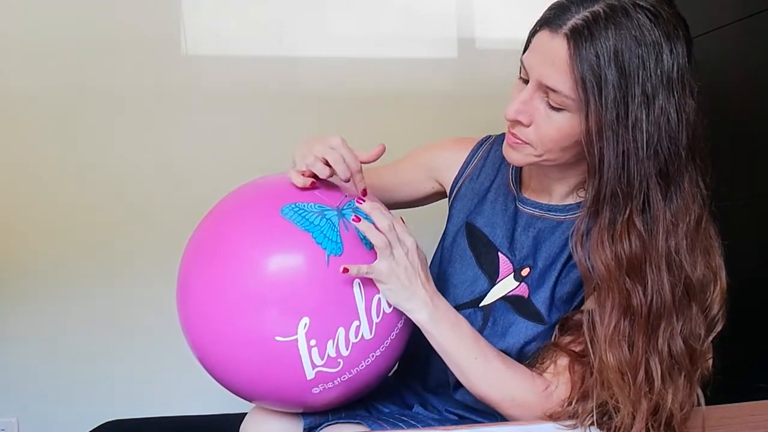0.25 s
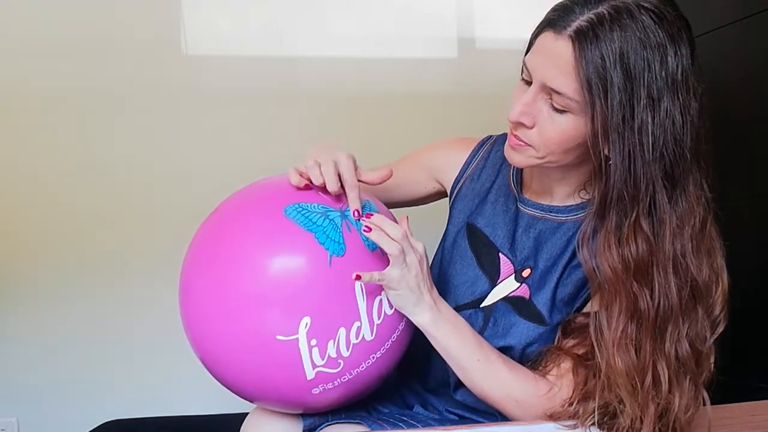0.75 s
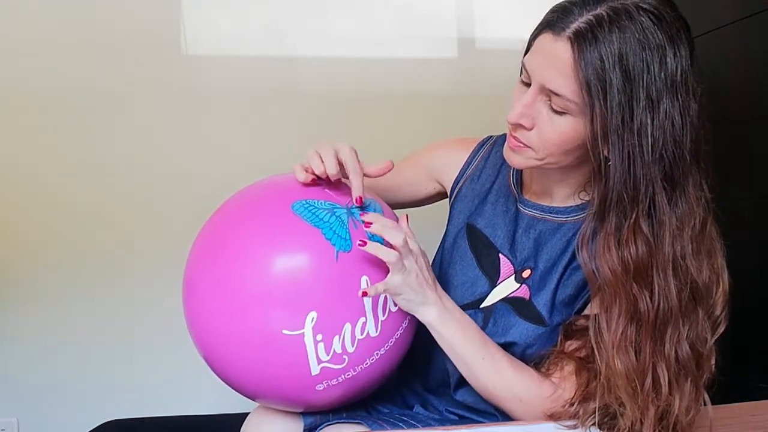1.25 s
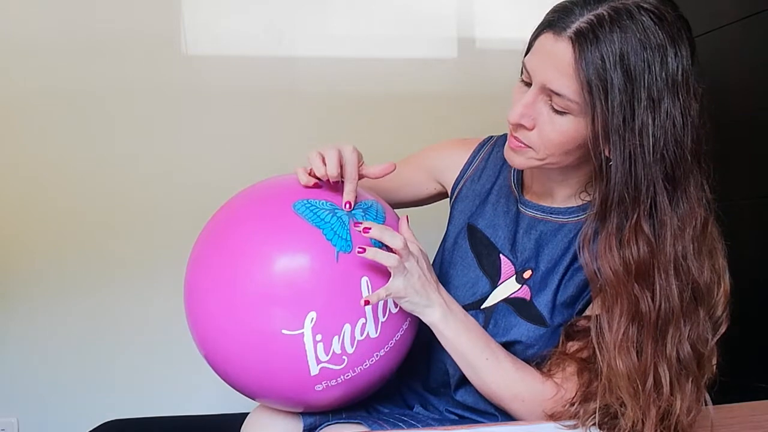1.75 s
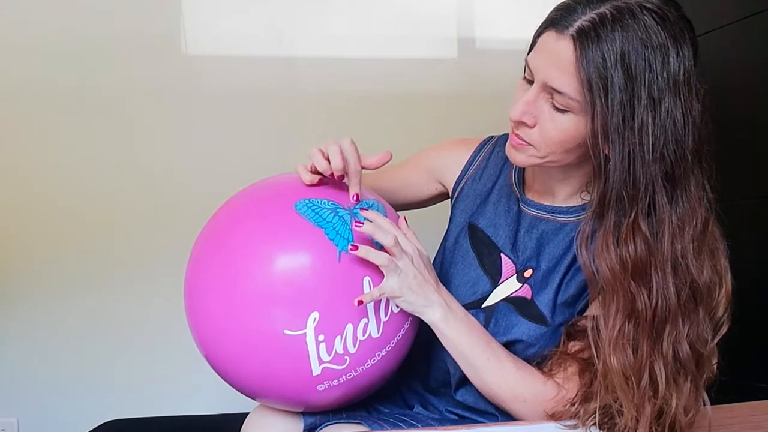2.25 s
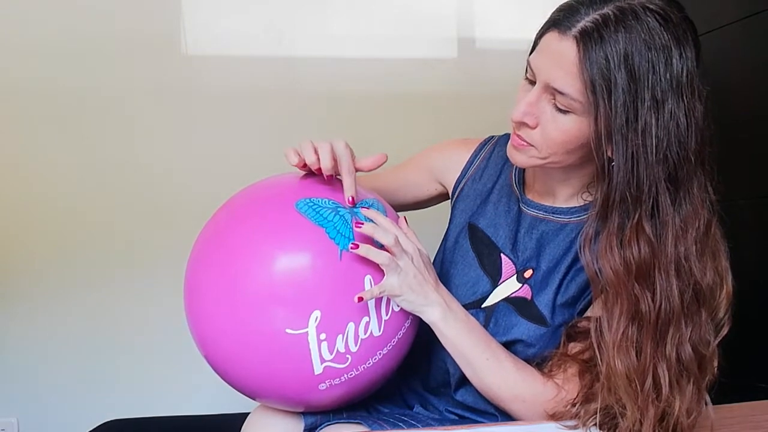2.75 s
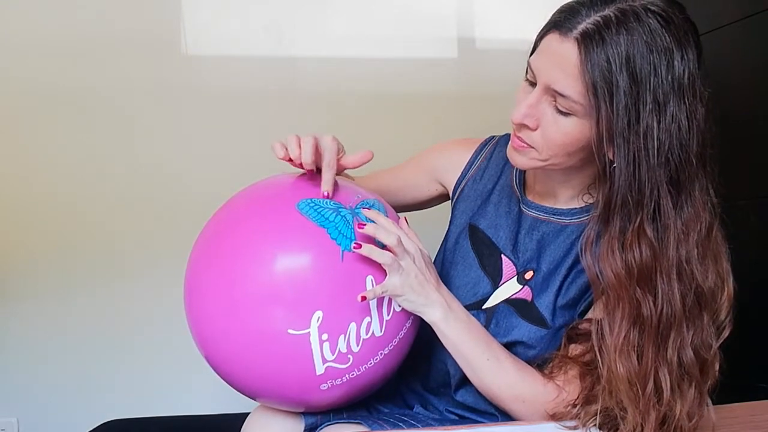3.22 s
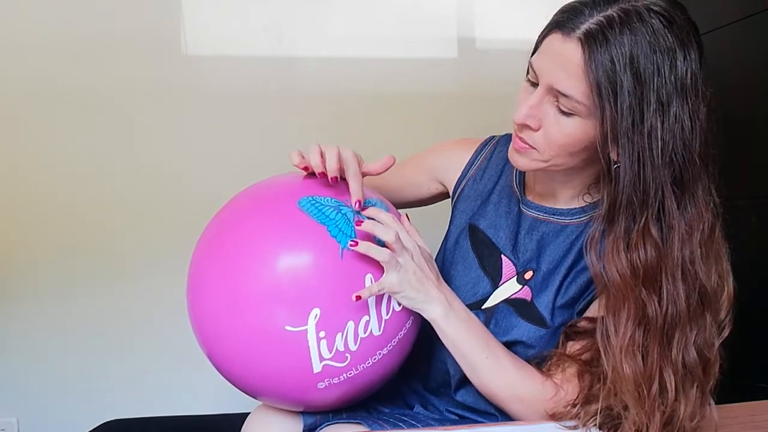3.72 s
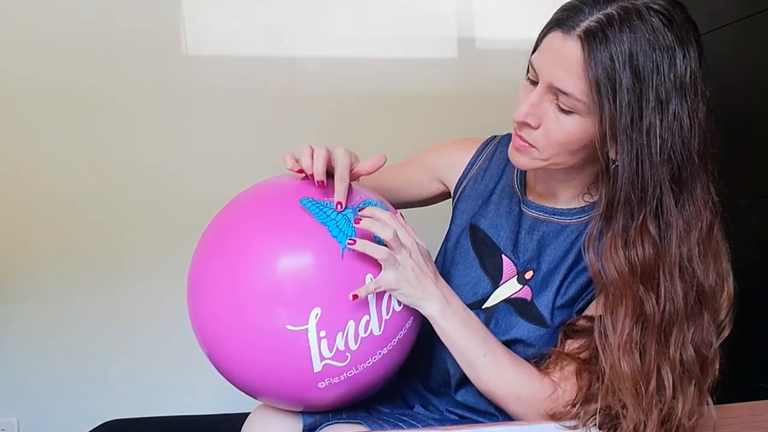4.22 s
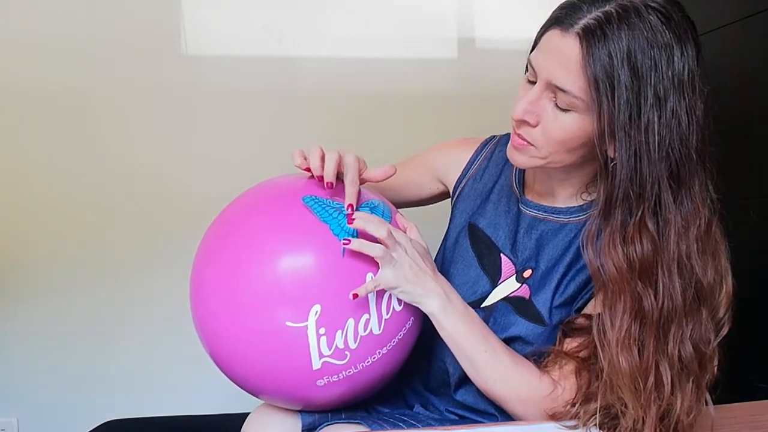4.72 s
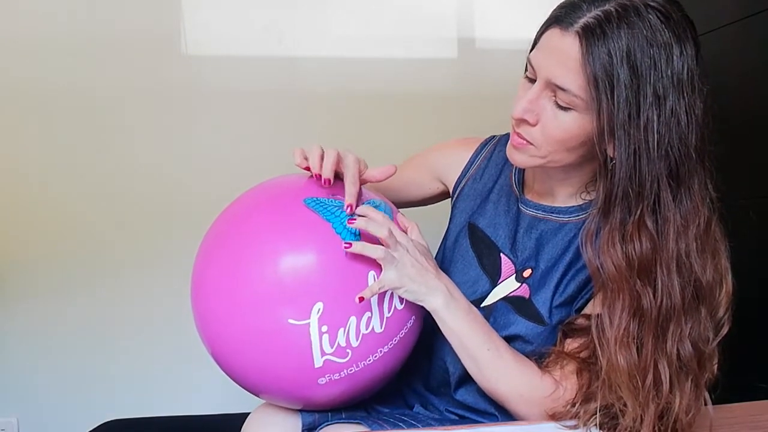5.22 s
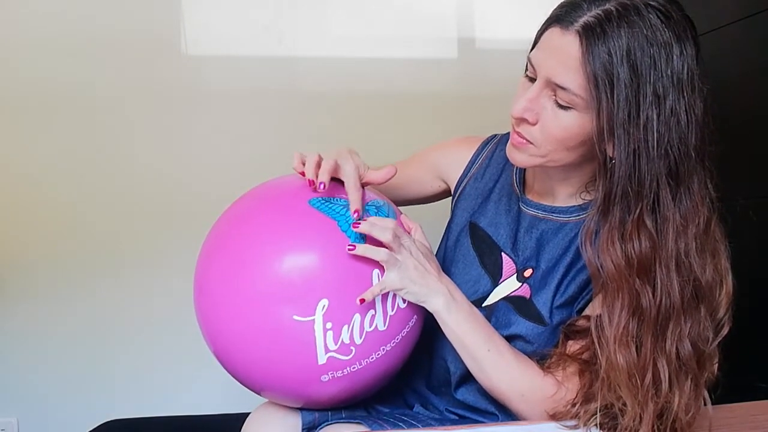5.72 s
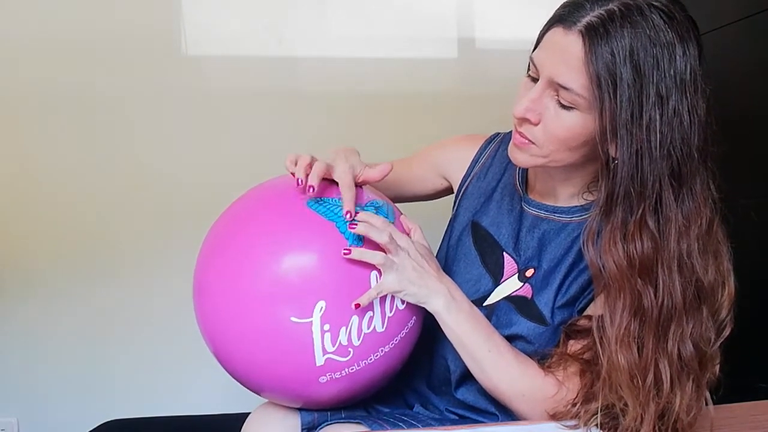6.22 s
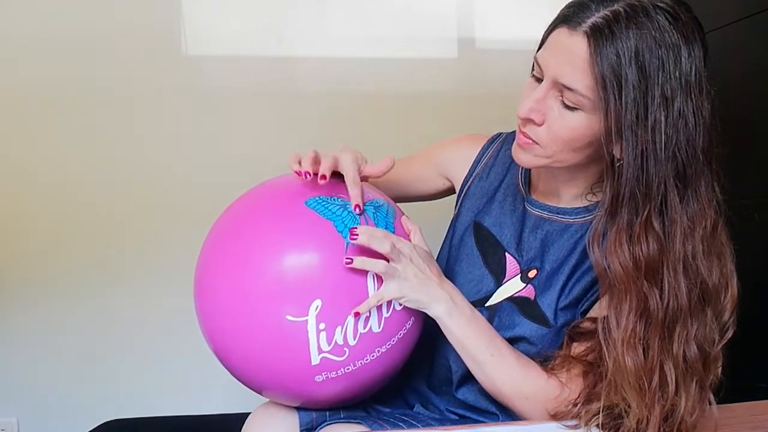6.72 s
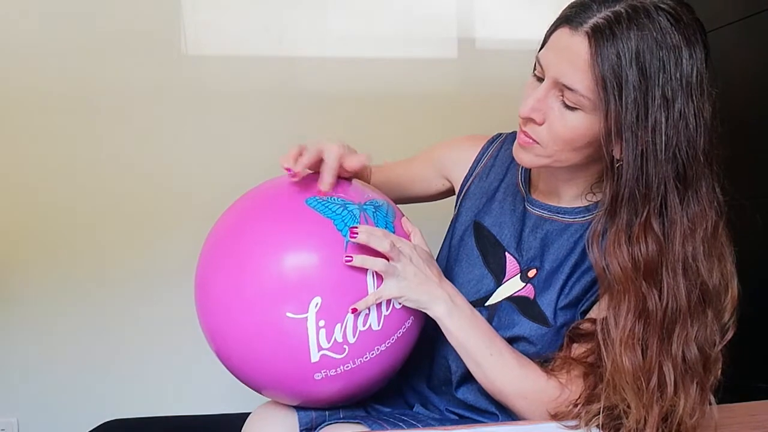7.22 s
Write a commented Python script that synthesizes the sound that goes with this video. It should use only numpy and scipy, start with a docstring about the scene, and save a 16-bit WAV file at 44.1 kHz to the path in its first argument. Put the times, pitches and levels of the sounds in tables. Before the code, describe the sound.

In a small quiet room, fingers work over an inflated latex balloon with ringing taps, rasping slides, small snaps and brief groans.

```python
"""Fingers on a balloon

Fingertips work over a big, tight latex balloon in a small quiet room. Taps and sudden slips make its
skin and the air inside ring, and now and then the latex snaps. Sliding fingers make a dense crackle of
tiny slips, which turns into a low rubbery groan where they grip. The walls add a short echo, and a
faint hiss lies under it all."""
import sys
import numpy as np
from scipy import signal
from scipy.fft import rfft, irfft
from scipy.io import wavfile
from scipy.ndimage import uniform_filter1d

SR = 44100
rng = np.random.default_rng(int(sys.argv[2]) if len(sys.argv) > 2 else 0)


def transcribe(u):
    """Save the signal u as a 16-bit wav file named by the first command-line argument.

    u: samples, shape (n,) or (channels, n), limited to [-1, 1]; the rate is SR.
    q: integer samples, one column per channel.
    """
    v = np.clip(np.atleast_2d(u).T, -1, 1)
    q = np.round(v * 32767).astype(np.int16)
    wavfile.write(sys.argv[1], SR, q)


N = 328831
TIME = np.arange(N) / SR
TAIL = TIME[:SR // 2]  # half a second for a sound to die away

# Table levels are relative. A fade time (t60) is how long a sound takes to drop by 60 dB.
# The tone of the quiet room. Each row: frequency in Hz, level in dB.
ROOM_TONE = [(15, -50), (25, -2.5), (75, -3), (110, -6.5), (173, -7), (240, -14), (331, -11.5), (495, -17),
             (614, -13), (684, -16.5), (919, -15), (1530, -15.5), (2700, -20), (7910, -23), (15500, -31.5)]
# How alike left and right are in sound from all around. Each row: frequency in Hz, likeness from
# -1 (opposite) to 1 (the same).
STEREO_LIKENESS = [(80, 0.99), (150, 0.88), (300, 0.31), (600, -0.62), (1300, 0.23), (3000, -0.046),
                   (12000, -0.11)]
# The notes the balloon rings at, first the skin's, then those of the air inside.
# Each row: pitch in Hz, level in dB, fade time in seconds.
BALLOON_NOTES = [(57.4, 5.5, 0.16), (91.8, 7, 0.1), (124, 1.5, 0.12), (186, 1, 0.088), (236.6, -0.5, 0.051),
                 (289.4, 1.5, 0.086), (410, 4, 0.046), (537.7, 5.5, 0.078), (636, -13.5, 0.36),
                 (712, -10, 0.3), (785, -27, 0.45), (941, -4.5, .2), (1040, -5, 0.16), (1066, -26, 0.4),
                 (1390, -5.5, 0.065), (1523, 3, 0.04), (2070, -5, 0.12), (2500, -14, 0.16),
                 (2826, 4, 0.044), (3320, -7, 0.25), (3585, -2, 0.13)]
# The tone of nail ticks and fingertip hiss. Each row: frequency in Hz, boost or cut in dB.
HISS_TONE = [(900, 2.5), (1900, 6), (3000, 8), (4800, 4), (6000, -2), (8500, -6.5), (11000, -12),
             (16000, -7)]
# Sharp snaps of the latex, and bright scrapes and ticks of a fingernail. Each row: start in seconds, level in
# dB, middle frequency in Hz, width of the band in Hz, fade time in seconds.
BRIGHT_BURSTS = [(0.009, -30.5, 3160, 330, 0.21), (0.010, -26.5, 7100, 2340, 0.03),
                 (0.958, -42.5, 4200, 2000, 0.033), (5.932, -49, 2050, 450, 0.14),
                 (3.435, -48, 7000, 4500, 0.15), (3.475, -31.5, 8400, 7040, 0.018),
                 (3.499, -53, 7850, 3000, 0.097), (6.482, -47, 3260, 2300, 0.036)]
# A finger grips and judders until it lets go. Each row: start and length in seconds, first and last
# slip rate in Hz, level in dB, the octave's level against the lowest note in dB, unsteadiness (0 to 1).
FINGER_GRIPS = [(1.758, 0.049, 132, 135, -34.5, -4.5, 0.07), (1.797, 0.075, 139.5, 131.4, -32, -7.5, 0.04),
                (2.161, 0.12, 380, 416, -48, -18, 0.1), (3.792, .06, 296, 285, -45.5, -25, 0.2),
                (4.943, 0.048, 164, 162, -36, -13, 0.09), (5.826, 0.034, 272, 272, -33.5, -0.5, 0.08),
                (5.865, 0.063, 250.4, 208.6, -30, 1.5, 0.13), (5.919, 0.037, 252.5, 260, -25.5, 1.5, 0.14),
                (5.962, 0.056, 249.5, 201.7, -25.5, -1, .07), (6.02, 0.053, 224, 217.6, -31, -14, 0.13),
                (6.054, 0.062, 221, 243, -38.5, -7.5, .05), (6.297, 0.031, 268, 282, -42, -25, 0.15),
                (6.343, .035, 290, 293, -47.5, -3, .08)]
# A finger slides, speeds up and stops; a flat, firm pad is deeper and duller than a tip.
# Each row: fastest moment, swell time and ease-off time in seconds, levels of drag, rasp and hiss
# in dB, bottom of the drag in Hz, top of the rasp in Hz.
FINGER_STROKES = [(0.023, 0.075, 0.1, -29.5, -35, -34, 80, 1220),
                  (0.15, 0.043, 0.2, -46, -51.5, -58, 90, 1490),
                  (0.84, 0.072, 0.22, -43, -76, -66, 110, 1180),
                  (0.975, 0.14, 0.13, -39.5, -33, -49, 90, 1460),
                  (1.075, 0.057, 0.11, -39, -60, -57, 65, 1400),
                  (1.48, 0.078, 0.055, -69, -63, -60, 100, 1560),
                  (1.63, 0.07, 0.091, -48, -69, -66, 110, 1000),
                  (1.825, 0.18, 0.095, -47, -49, -53, 130, 910),
                  (1.95, 0.074, 0.052, -45, -44.5, -57, 120, 1210),
                  (2.228, 0.15, 0.087, -47, -44, -48.5, 170, 2420),
                  (2.32, 0.14, .2, -60, -62, -51.5, 150, 1810), (2.93, .2, 0.24, -68, -72, -64, 150, 1500),
                  (3.15, 0.071, 0.072, -64, -47, -55, 130, 1700),
                  (3.24, 0.18, 0.18, -74, -77, -57, 130, 1500),
                  (3.505, 0.15, 0.1, -37.5, -35.5, -42, 130, 1480),
                  (3.58, 0.057, 0.037, -51, -41, -56, 125, 1490),
                  (4.18, 0.082, 0.093, -37, -39.5, -51, 100, 1970),
                  (4.28, 0.085, 0.046, -38, -49, -56, 100, 1570),
                  (4.938, 0.068, 0.097, -41, -36.5, -51.5, 128, 910),
                  (5.061, 0.099, 0.066, -41.5, -46.5, -54.5, 110, 970),
                  (5.399, 0.099, 0.33, -45.5, -46.5, -56, 138, 840),
                  (5.488, 0.15, 0.098, -41, -38, -49, 100, 820),
                  (5.89, 0.098, 0.071, -29, -30, -52, 150, 770),
                  (5.942, 0.027, 0.13, -37, -32.5, -48.5, 111, 2200),
                  (5.989, 0.056, 0.1, -32.5, -25, -57, 101, 1030),
                  (6.08, 0.1, 0.047, -51, -49, -48, 100, 1330),
                  (6.435, 0.2, 0.13, -42, -36.5, -45.5, 50, 1120),
                  (6.5, 0.047, 0.13, -29, -36, -50.5, 55, 950),
                  (6.551, 0.023, 0.098, -29, -30, -53, 70, 980),
                  (6.87, 0.28, 0.14, -58, -51.5, -50, 60, 1390),
                  (7.08, 0.059, 0.081, -48, -53.5, -77, 70, 1410),
                  (7.22, .2, 0.13, -73, -49, -47.5, 70, 1356),
                  (7.27, 0.032, 0.046, -49, -50, -53, 70, 1390)]
# Fingers landing or slipping free. Each row: start in seconds, thump level in dB, rough thump pitch
# in Hz, knock level in dB, nail tick level in dB.
FINGER_TAPS = [(0.008, -20, 258, -36, -17), (0.311, -39, 80, -48.5, -44), (0.452, -15.5, 94.5, -42.5, -40),
               (0.48, -29, 109, -38.5, -45), (0.559, -27.5, 300, -40.5, -48),
               (0.684, -33.5, 100, -40.5, -43.5), (0.793, -31, 227, -60, -52),
               (0.957, -25.5, 122, -28.5, -38), (0.987, -24.5, 106, -28, -37), (1.04, -33.5, 197, -44, -39),
               (1.479, -59, 100, -55, -41.5), (1.571, -28.5, 283, -59, -53), (1.954, -43, 182, -43, -56),
               (2.056, -35.5, 130, -51, -42.5), (2.127, -37, 90, -51, -46), (2.584, -37, 396, -38.5, -51),
               (3.119, -56, 130, -39.5, -39), (3.475, -40, 200, -49, -39), (3.498, -40, 202, -31.5, -24),
               (3.563, -28.5, 524, -33, -46), (3.669, -45, 100, -47, -40), (3.778, -23.5, 232, -31, -38.5),
               (4.093, -31.5, 197, -33, -37.5), (4.151, -28.5, 197, -28.5, -37.5),
               (4.164, -40, 300, -30.5, -46), (4.183, -47, 200, -33.5, -58), (4.374, -36.5, 123, -57, -54),
               (4.622, -38.5, 205, -45, -60), (4.914, -30, 219, -39, -55), (4.95, -28, 187, -38, -54),
               (5.022, -24.5, 545, -51, -48), (5.224, -41, 79, -55, -60), (5.691, -29, 513, -42.5, -46),
               (5.927, -16, 480, -24.5, -44), (6.42, -16.5, 285, -23, -34), (6.461, -21, 75, -50, -48),
               (6.481, -9, 340, -19, -25), (6.538, -15, 325, -51, -39), (6.671, -36, 80, -41, -58),
               (6.73, -40, 80, -41.5, -52), (7.445, -36, 94, -48, -39)]


def amp(db):
    """Turn decibels into a gain to multiply by."""
    return 10 ** (np.asarray(db) / 20)


def unit(x):
    """Scale a signal to an average strength (rms) of 1."""
    return x / np.sqrt(np.mean(x ** 2))


def fade(t60):
    """A curve that drops by 60 dB every t60 seconds."""
    return np.exp(-np.log(1000) * TAIL / t60)


def band(x, lo_hz, hi_hz, order=2):
    """Keep what lies between two frequencies."""
    sos = signal.butter(order, [lo_hz, min(hi_hz, SR / 2 - 1)], "band", fs=SR, output="sos")
    return signal.sosfilt(sos, x + 1e-18)


def on_bins(points, size):
    """Join (Hz, value) points into a curve over a whole spectrum."""
    hz, value = np.transpose(points)
    return np.interp(np.log(np.fft.rfftfreq(size, 1 / SR) + 1), np.log(hz), value)


def colour(x, points):
    """Shape a sound's tone with (Hz, dB) points."""
    return irfft(rfft(x) * amp(on_bins(points, len(x))), len(x))


def ring(drive, response):
    """Let every push in the drive set off the response, scaled to an energy of 1."""
    return signal.fftconvolve(drive, response / np.linalg.norm(response))[:N]


def add(out, s, sound):
    """Mix a sound in, starting at s seconds."""
    start = max(int(s * SR), 0)
    out[start:start + len(sound)] += sound[:max(N - start, 0)]


def waver(per_s):
    """A random wobble that glides to a new value per_s times a second."""
    size = int(SR / per_s)
    steps = np.repeat(rng.standard_normal(N // size + 1), size)
    return unit(uniform_filter1d(steps, size)[:N])


def diffuse(size):
    """Noise from all around: left and right are alike in the bass and unrelated in the treble."""
    like = np.clip(on_bins(STEREO_LIKENESS, size), -1, 1)
    mid, side = (irfft(rfft(rng.standard_normal(size)) * np.sqrt((1 + sign * like) / 2), size)
                 for sign in (1, -1))
    return np.array([mid + side, mid - side])


def background(noise_db=-53.5, whine_hz=14406, whine_db=-83):
    """Steady room noise and hiss with a faint electrical whine."""
    air = np.array([colour(side, ROOM_TONE) for side in diffuse(N)])
    whine = unit(band(rng.standard_normal(N), whine_hz - 25, whine_hz + 25))
    return air / air.mean(axis=0).std() * amp(noise_db) + amp(whine_db) * whine


def room(x, echo_db, pan_db, low_t60=0.21, high_t60=0.3, build_s=0.0091):
    """Near walls add a short echo without deep bass. A positive pan_db moves the sound left."""
    low_tail = band(diffuse(len(TAIL)), 150, 1550, order=1) * fade(low_t60)
    high_tail = band(diffuse(len(TAIL)), 2780, 14400, order=1) * fade(high_t60)
    tail = (low_tail + high_tail) * np.clip(TAIL / build_s, 0, 1)
    echo = np.array([ring(x, side) for side in tail])
    pan = amp(np.array([[pan_db], [-pan_db]]) / 2)
    return (x + amp(echo_db) * echo) * pan / np.hypot(1, amp(echo_db) / 2)


def balloon(notes_db=-49):
    """How the balloon answers one slip: the skin flicks, then skin and air ring on."""
    notes = sum(amp(db) * fade(t60) * np.cos(2 * np.pi * hz * TAIL) for hz, db, t60 in BALLOON_NOTES)
    response = amp(notes_db) * notes
    response[0] += 1  # the flick
    return response


def bursts():
    """Latex snaps, or a nail scrapes or ticks, in a bright burst that dies quickly."""
    out = np.zeros(N)
    for s, db, hz, width_hz, t60 in BRIGHT_BURSTS:
        noise = rng.standard_normal(len(TAIL))
        burst = unit(band(noise, max(hz - width_hz / 2, hz / 10), hz + width_hz / 2))
        add(out, s, amp(db) * burst * fade(t60))
    return out


def groans(attack_s=0.008, release_s=0.017, octave_fall_db=9.5, third_db=-15, slope_db=-5, grit_db=-6):
    """A gripping finger sticks and slips unevenly; the soft skin gives mostly a note and its octave."""
    out = np.zeros(N)
    jitter = waver(260)
    flutter = 1 + .45 * np.tanh([waver(170), waver(240)])
    sharpness = waver(220)  # differs from slip to slip, which roughens the overtones
    grit = unit(band(rng.standard_normal(N), 880, 2200, order=4))
    for s, length_s, first_hz, last_hz, db, octave_db, unsteady in FINGER_GRIPS:
        on = (TIME >= s) & (TIME < s + length_s)
        age = TIME[on] - s
        progress = age / length_s
        force = amp(db) * np.minimum(age / attack_s, 1) * np.minimum((length_s - age) / release_s, 1)
        hz = (first_hz + (last_hz - first_hz) * progress) * (1 + unsteady * jitter[on])
        phase = 2 * np.pi * np.cumsum(hz) / SR
        octave = amp(octave_db + octave_fall_db * (.5 - progress))  # the groan mellows as it goes
        tone = flutter[0, on] * np.sin(phase) + flutter[1, on] * octave * np.sin(2 * phase)
        overtones = sum(amp(third_db + slope_db * k) * np.sin((k + 3) * phase) for k in range(5))
        # the skin rasps while it slips, more so when pressed harder
        rasp = amp(grit_db) * np.sqrt(np.abs(force)) * grit[on] * np.maximum(np.sin(phase), 0)
        out[on] += np.sqrt(2) * force * (tone + sharpness[on] * overtones + rasp)
    return out


def slips(per_s, spread_db):
    """Tiny slips at random moments, a few much larger than the rest."""
    happens = rng.random(N) < per_s / SR
    return unit(happens * rng.standard_normal(N) * amp(spread_db * rng.standard_normal(N)))


def rubbing(body, drag_db=-4, rasp_db=-4.5, hiss_db=-1, whisper_db=-42, fine_share=0.79, swell_db=26):
    """Coarse slips drag and rasp the skin, and fingertip ridges add a fine hiss. Faster is louder."""
    out = np.zeros(N)
    coarse = slips(per_s=1500, spread_db=2.64)
    fine = unit((1 - fine_share) * coarse + fine_share * slips(per_s=7000, spread_db=4.2))
    whisper = unit(band(rng.standard_normal(N), 6000, 9200, order=1))
    bright_body = colour(np.roll(body, shift=64), HISS_TONE)
    for s, swell_s, ease_s, low_db, mid_db, high_db, low_hz, top_hz in FINGER_STROKES:
        from_peak = np.maximum((s - TIME) / swell_s, (TIME - s) / ease_s)
        on = from_peak < 2
        start = TIME[on][0]
        speed = amp(-swell_db * from_peak[on] ** 1.165)  # power 1 gives a pointed peak, 2 a round one
        drag = ring(coarse[on] * speed, band(body, low_hz, 310))
        rasp = ring(coarse[on] * speed, band(body, top_hz / 2.7, top_hz, order=3))
        hiss = ring(fine[on] * speed, bright_body)
        for part, db in ((drag, low_db + drag_db), (rasp, mid_db + rasp_db), (hiss, high_db + hiss_db)):
            add(out, start, amp(db) * part)
        # even a light touch whispers
        add(out, start, amp(whisper_db) * whisper[on] * np.sqrt(amp(high_db) * speed))
    return out


def taps(body, thump_db=-3, knock_db=1, tick_db=1, scuff_db=-12, nail_rise_s=0.0016):
    """The pad of the finger thumps and knocks; the nail settles and scuffs for a moment."""
    out = np.zeros(N)
    for s, low_db, hz, mid_db, high_db in FINGER_TAPS:
        pad = amp(scuff_db) * rng.standard_normal(len(TAIL)) * fade(t60=0.052)
        pad[0] += 1  # the hit itself
        nail = rng.standard_normal(len(TAIL)) * fade(t60=0.036) * np.minimum(TAIL / nail_rise_s, 1)
        soft_push = band(body, hz / 1.82, hz * 1.45, order=1)
        thump = band(soft_push, hz / 3, hz + 330)
        knock = band(ring(pad, body), 330, 1460, order=3)
        tick = colour(band(ring(nail, body), 1140, 5500, order=1), HISS_TONE)
        parts = (thump, low_db + thump_db), (knock, mid_db + knock_db), (tick, high_db + tick_db)
        for part, db in parts:
            add(out, s, amp(db) * part / np.abs(part).max())
    return out


def scene(groan_lag_s=0.00025):
    """Put it all in the room: fingers a little right of centre, sharp bursts a little left."""
    body = balloon()
    left, right = room(groans(), echo_db=-2, pan_db=-2, low_t60=0.14)
    late_left = np.interp(TIME - groan_lag_s, TIME, left)  # the groan reaches the left side later
    groaning = np.array([late_left, right])
    tapping = room(taps(body), echo_db=4.5, pan_db=-0.8)
    bursting = room(bursts(), echo_db=0, pan_db=1)
    sliding = room(rubbing(body), echo_db=-0.5, pan_db=-1)
    return background() + bursting + groaning + sliding + tapping


def record(dry, top_hz=15730):
    """Cut away the very highest treble."""
    return signal.sosfilt(signal.ellip(12, .1, 80, top_hz, fs=SR, output="sos"), dry)


dry = scene()
out = record(dry)
transcribe(out)
```